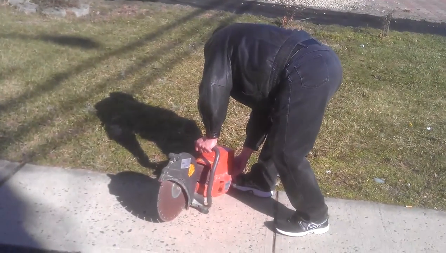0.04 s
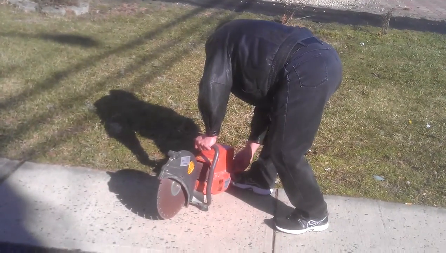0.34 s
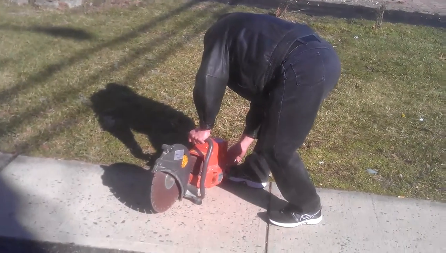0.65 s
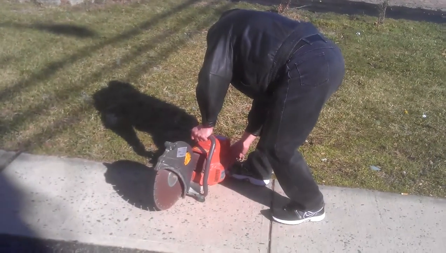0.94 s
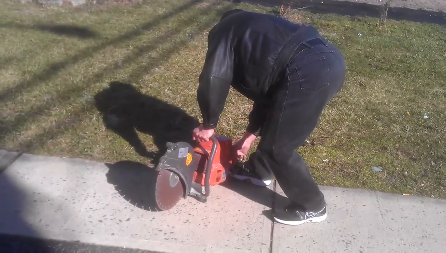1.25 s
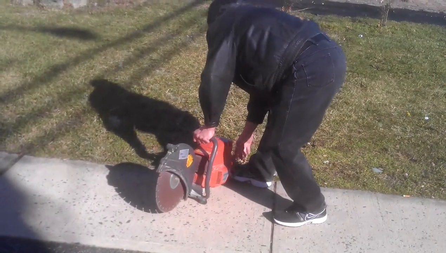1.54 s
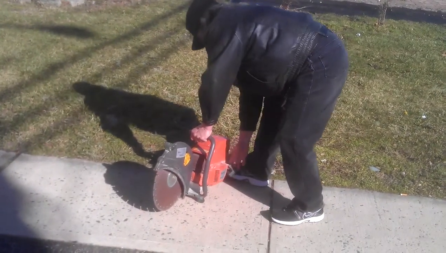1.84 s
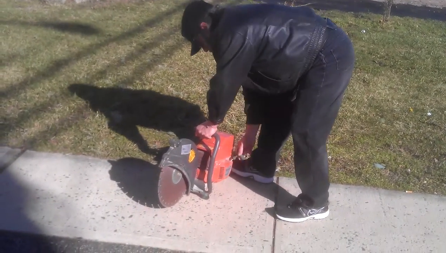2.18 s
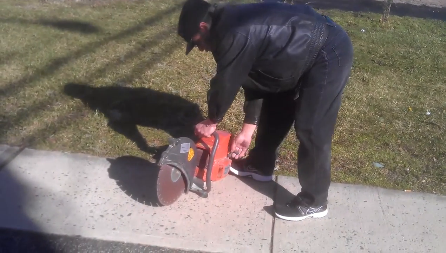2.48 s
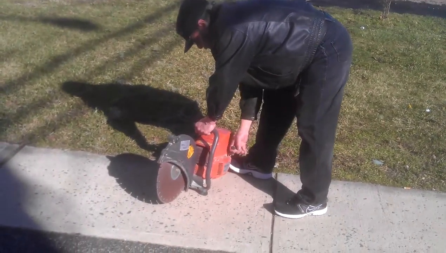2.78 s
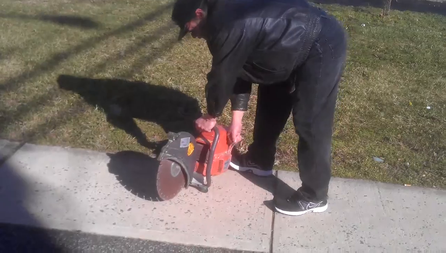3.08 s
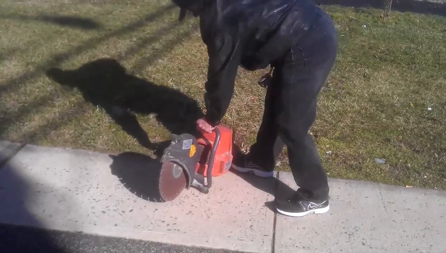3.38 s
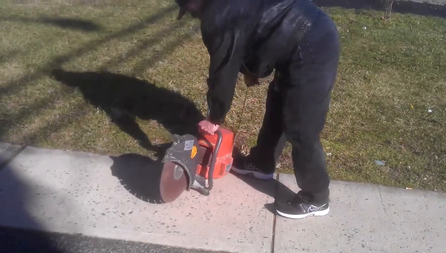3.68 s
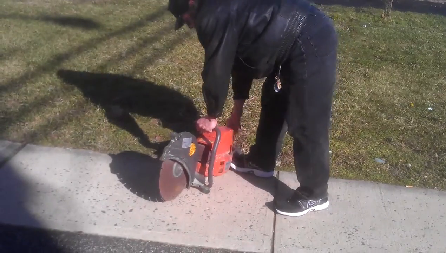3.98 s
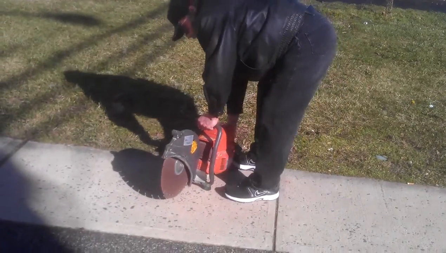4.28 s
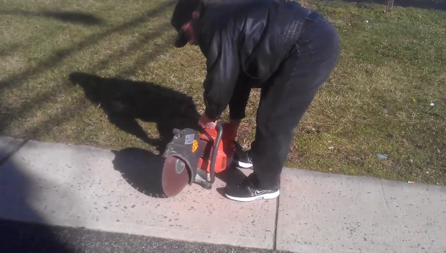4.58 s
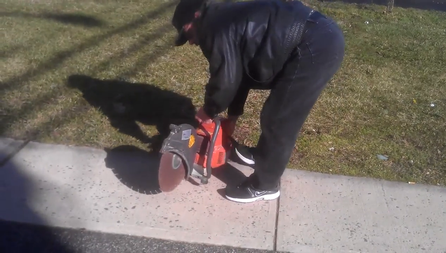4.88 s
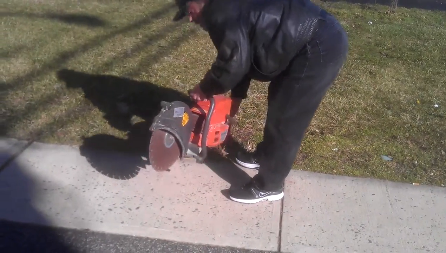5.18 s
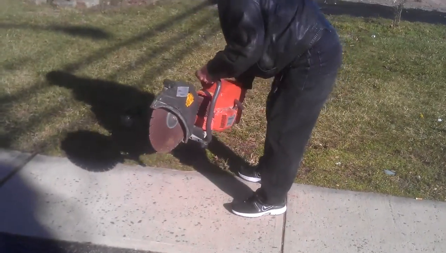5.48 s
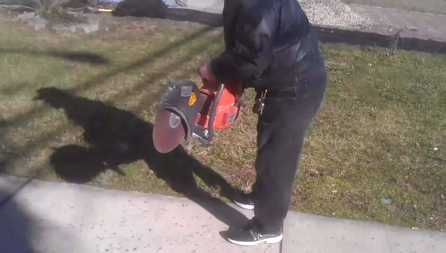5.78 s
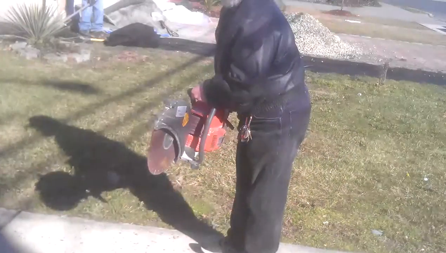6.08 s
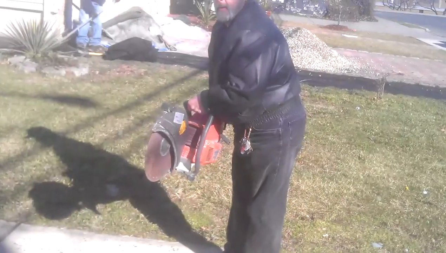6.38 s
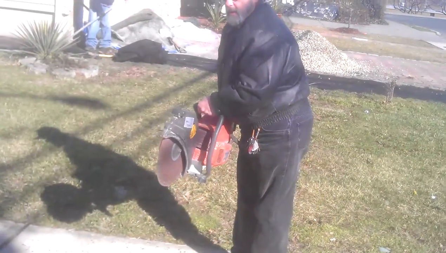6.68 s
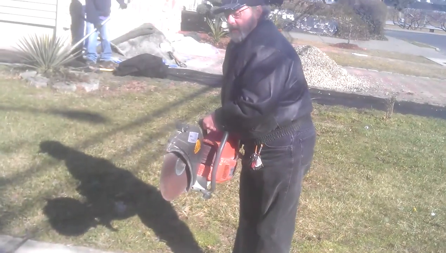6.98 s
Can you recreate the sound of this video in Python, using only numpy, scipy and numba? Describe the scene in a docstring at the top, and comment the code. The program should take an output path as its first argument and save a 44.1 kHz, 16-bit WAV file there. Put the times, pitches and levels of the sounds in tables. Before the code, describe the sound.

A two-stroke saw drones and surges under metallic ringing, then slows to an uneven, popping, clattering idle.

```python
"""A surging engine drone under a ringing, rattling blade: a two-stroke cut-off saw runs free by a house.
The piston forces the blade into its resonant modes, the casing hisses and the exhaust rasps.
After about 3.4 s the saw drops to a lumpy idle: the intake excites the air box on every turn, but
only every few turns does the cylinder fire, with a sharp bark. Twice it briefly purrs evenly.
The pavement scatters the sound, and the house returns a faint echo."""
import sys
import numpy as np
from scipy import signal
from scipy.fft import rfft, irfft
from scipy.io import wavfile
from scipy.ndimage import uniform_filter1d, minimum_filter1d
from numba import njit

SR = 44100
rng = np.random.default_rng(int(sys.argv[2]) if len(sys.argv) > 2 else 0)


def persist_wave(psi):
    """Save psi, clipped to +-1, as 16-bit WAV."""
    counts = np.round(np.clip(psi, -1, 1) * 32767).astype(np.int16)
    wavfile.write(sys.argv[1], SR, np.atleast_2d(counts).T)


N = 319284
T = np.arange(N) / SR

# Spectrum of the casing's hiss. Each row: frequency in Hz, relative level in dB.
HISS_SPECTRUM = [(1940, -60), (3300, -12), (3450, -15), (3670, -3.5), (3800, -9), (4150, -10.5),
                 (5620, -11), (6360, -11), (6890, -20.5), (7800, -9), (9000, -16), (9690, -9), (10400, -7),
                 (13500, -22.5), (14500, -43)]
# Spectrum of the exhaust's rasp. Each row: frequency in Hz, relative level in dB.
RASP_SPECTRUM = [(210, -9.5), (350, -19.5), (462, -21.5), (507, -12), (546, -23), (651, -16.5), (707, -13),
                 (859, -3), (1100, -8), (1420, -4.5), (1850, 2.5), (2050, 4), (2360, -3), (2590, 5.5),
                 (3200, -8.5), (4160, -17), (7040, -120)]
HUM_END_S, HUM_FADE_S = 1.33, .037
SETTLE_S, SETTLE_FADE_S = 1.72, .1  # the blade's modes shift as the saw settles


def undb(db):
    """Amplitude ratio of a level in decibels."""
    return 10 ** (np.asarray(db) / 20)


def unit(x):
    """Normalisation to an rms of 1."""
    return x / np.sqrt(np.mean(x ** 2))


def curves(table):
    """Linear interpolation of each column over the times in the first."""
    times, *columns = np.transpose(table)
    return [np.interp(T, times, column) for column in columns]


def step(at_s, fade_s):
    """Smooth transition from 0 to 1 around a moment."""
    return .5 + .5 * np.tanh((T - at_s) / fade_s)


def swells(rows):
    """Sum of Gaussian level changes in dB; each length is the width at half height."""
    return sum(db * .5 ** ((2 * (T - centre) / length) ** 2) for centre, length, db in rows)


def noise():
    """Gaussian white noise."""
    return rng.standard_normal(N)


def walk(rate_hz):
    """Smooth random fluctuation with a spread near 1."""
    hold = int(SR / rate_hz)
    return 1.33 * uniform_filter1d(np.repeat(rng.standard_normal(N // hold + 1), hold), hold)[:N]


def highpass(x, order, hz):
    """Butterworth attenuation below a cut-off frequency."""
    return signal.sosfilt(signal.butter(order, hz, "high", fs=SR, output="sos"), x)


def colour(x, spectrum, closed=True):
    """Spectral shaping by (Hz, dB) points; closed ends fall away steeply."""
    hz, db = np.transpose(spectrum)
    log_f = np.log(np.maximum(np.fft.rfftfreq(2 * N, 1 / SR), 1))
    beyond = np.abs(log_f - np.clip(log_f, np.log(hz[0]), np.log(hz[-1])))
    gain = undb(np.interp(log_f, np.log(hz), db) - closed * 60 * beyond)
    taps = np.roll(irfft(gain), 1024)[:2048] * np.hanning(2048)
    return signal.fftconvolve(x, taps)[1024:1024 + N]


@njit
def resonator(x, hz, width_hz):
    """A damped oscillator: band-pass response about a moving natural frequency."""
    y, band_state, low_state = np.empty(len(x)), 0., 0.
    for i in range(len(x)):
        tuning, damping = np.tan(np.pi * hz[i] / SR), width_hz / hz[i]
        band = (band_state + tuning * (x[i] - low_state)) / (1 + tuning * (tuning + damping))
        band_state = 2 * band - band_state
        low_state += 2 * tuning * band
        y[i] = damping * band
    return y


def per_cycle(cycles, scatter_db):
    """Cycle-to-cycle variation: a random gain held for one cycle."""
    gains = undb(scatter_db * rng.standard_normal(2048).clip(-2, 1.2))
    return gains[np.floor(cycles).astype(int) % 2048]


def chatter(cycles, decay, scatter_db, steady):
    """Amplitude-modulated noise: it flares each cycle and decays towards a steady rush."""
    return noise() * (steady + np.exp(-(cycles % 1) / decay) * per_cycle(cycles, scatter_db))


def bursts(times, levels_db, rise_s, decay_s, hold_s=0):
    """Noise transients with exponential rise and decay, which add in power."""
    power = np.zeros(N)
    for at_s, db in zip(times, levels_db):
        near = slice(*np.searchsorted(T, [at_s - .02, at_s + .08]))
        age = T[near] - at_s
        envelope = np.exp(np.minimum(age / rise_s, (hold_s - age) / decay_s).clip(None, 0))
        power[near] += (undb(db) * envelope) ** 2
    return np.sqrt(power) * noise()


def harmonic(turns, order, db, waver_db=1.3):
    """A sinusoid at one multiple of the crank speed, wavering in level."""
    return np.sqrt(2) * np.sin(2 * np.pi * (order * turns + rng.random())) * undb(db + waver_db * walk(6.4))


def outdoor_air():
    """Ambient noise: a faint, low rush of fluctuating level."""
    # Each row: frequency in Hz, relative level in dB.
    spectrum = [(25, -11), (60, -19), (110, 5.5), (200, 16), (500, -18), (2000, -16), (10000, -23)]
    return unit(colour(noise(), spectrum)) * undb(-59.5 + 2 * walk(4.23))


def outdoors(near_face, far_face, scatter_s, house_db, house_s):
    """Scattering from the pavement makes the sides differ; reflection adds an echo and a faint tail."""
    # Stereo width. Each row: frequency in Hz, gain of the side signal in dB.
    width = [(100, -9), (200, -29), (350, 0.5), (620, 15.5), (1200, -3.5), (2400, 2.5), (4500, 2),
             (8000, 3), (13000, 4)]
    wall_s, wall_db = .01025, -19
    t = T[:SR // 3]
    pavement, *house_echoes = rng.standard_normal((3, len(t)))
    # a quarter-cycle shift makes some frequencies lead on the left and others on the right
    lead = np.sign(rfft(pavement * np.exp(-t / scatter_s)).real)
    scatter = np.roll(irfft(1j * lead), 512)[:1024] * np.hanning(1024)
    incident = near_face + colour(.75 * far_face - .35 * near_face, [(1200, 0), (15000, 0)])
    side = colour(signal.fftconvolve(incident, scatter)[512:512 + N], width, closed=False)
    wall = undb(wall_db) * np.interp(T - wall_s, T, near_face, left=0)
    ears = []
    for sign, echoes in zip((1, -1), house_echoes):
        tail = echoes * np.exp(-t / house_s) * (t > .008)
        house = undb(house_db) * signal.fftconvolve(near_face, tail / np.linalg.norm(tail))[:N]
        ears.append(near_face + sign * side + wall + highpass(house, 2, hz=500) + outdoor_air())
    return np.array(ears)


def hum(hz=209.8, wobble=.0041, level_db=-50):
    """Beating: a wavering hum throbs against the drone, then dies away."""
    # Each row: harmonic number, relative level in dB.
    partials = [(1, 0), (4, -10), (5, 1)]
    phase = 2 * np.pi * np.cumsum(hz * (1 + wobble * walk(30.1))) / SR
    wave = sum(np.sin(k * phase) * undb(db + 2 * walk(19.6)) for k, db in partials)
    return unit(wave) * undb(level_db) * (1 - step(HUM_END_S, HUM_FADE_S))


def blade_song(rest_db=-37):
    """Narrow resonance: two high blade modes swell and fade as the saw shifts on the ground."""
    # Each row: centre in seconds, length in seconds, rise of the lower and of the upper mode in dB.
    spells = [(1.03, 0.6, 0, 7.5), (1.62, 0.44, 7.5, 5), (2.26, 0.2, 10, 2), (3.2, 0.4, 6.5, 5)]
    # Each row: frequency in Hz, bandwidth in Hz, an unused level in dB.
    modes = [(7772, 45, 0), (10003, 35, 0)]
    centres, lengths, *rises = np.transpose(spells)
    song = 0
    for (hz, width_hz, _), rise_db in zip(modes, rises):
        ringing = signal.lfilter(*signal.iirpeak(hz, hz / width_hz, fs=SR), noise())
        song += unit(ringing) * undb(rest_db + swells(zip(centres, lengths, rise_db)))
    return song


def blade_notes(wander=.003, flutter_db=2.5):
    """Forced vibration: the engine sustains two blade modes as slightly unsteady tones."""
    # Each row: frequency in Hz, shift once settled in Hz, relative level in dB at first and once settled.
    notes = [(3565, -32, -36, -33.5), (3787, 40, -31.5, -32)]
    settled, tones = step(SETTLE_S, SETTLE_FADE_S), 0
    for hz, shift_hz, first_db, later_db in notes:
        cycles = np.cumsum((hz + shift_hz * settled) * (1 + wander * walk(30))) / SR
        db = first_db + (later_db - first_db) * settled + flutter_db * (walk(6) + walk(50))
        tones += np.sin(2 * np.pi * cycles) * undb(db)
    return tones


def blade_ring(force):
    """Modal response of a stiff disc: its modes wander as it turns; it radiates little below the first."""
    # Each row: frequency in Hz, bandwidth in Hz, gain in dB, shift once settled in Hz.
    modes = [(3590, 36, 6, -31), (3717, 55, 7.5, -8), (3778, 48, 9, 50), (3932, 97, 2, -39),
             (4130, 70, -1, -10), (4336, 70, -4, 15), (4415, 52, -0.5, 9), (4586, 65, -3.5, -6),
             (5085, 130, -8, 24), (5780, 34, -10.5, 8), (6210, 20, -7.5, 7), (6530, 23, -5, 16),
             (7510, 14, -12, 7), (8170, 56, -12, 9), (8240, 110, -5.5, -12)]
    settled, drift = step(SETTLE_S, SETTLE_FADE_S), .0012 * walk(8)
    ringing = 0
    for k, (hz, width_hz, db, shift_hz) in enumerate(modes):
        sign = (-1) ** k
        mode_hz = hz * (1 + sign * drift) + shift_hz * settled
        ringing += sign * undb(db) * resonator(force, mode_hz, float(width_hz))
    return highpass(ringing, 10, hz=3400)


def ticks(per_s, scatter_db):
    """A Poisson process: loose parts touch the blade and guard at random, with uneven force."""
    contacts = rng.random(N) < per_s / SR
    return unit(contacts * np.sign(noise()) * undb(scatter_db * noise().clip(-2, 1.5)))


def guard_knocks():
    """Impact excitation: hard blows of the guard ring the blade and the rest of the saw."""
    # Each row: time in seconds, relative peak level in dB.
    knocks = [(.0997, -4), (0.29, 3), (0.341, 3), (0.407, 6), (0.62, 5), (0.7176, 7.5), (0.7735, -12),
              (0.834, 8), (1.0717, 9), (1.1552, 7), (1.8666, 3), (2.0732, 7), (2.1266, -13), (2.762, -1),
              (3.246, 11), (3.2981, 3), (3.319, 6.5), (3.807, 3), (3.934, 0)]
    times, levels_db = np.transpose(knocks)
    blows = bursts(times + .0015, levels_db, rise_s=.0006, decay_s=.002)
    body = undb(-4.5) * colour(blows, HISS_SPECTRUM) + undb(-20) * colour(blows, RASP_SPECTRUM)
    return undb(-3) * blade_ring(blows) + body


def drone(turns, surge_db, dip_db):
    """Harmonic series of the crank: odd orders grow as the hum dies, high ones surge most, low ones dip."""
    # Each row: multiple of the crank speed, relative level in dB during the hum and after it.
    orders = [(2, -55, -59), (3, -68, -57.5), (4, -60.5, -60.5), (5, -80, -72), (6, -66, -64.5),
              (7, -80, -70), (8, -60.5, -63), (9, -80, -67), (10, -55.5, -62), (11, -75, -60.5),
              (12, -55, -56.5), (13, -80, -67), (14, -64, -63), (15, -80, -68), (16, -58, -59),
              (18, -58, -66), (20, -54, -66), (22, -55, -49.5), (23, -70, -58), (24, -57, -48),
              (25, -62, -49), (26, -70, -60), (31, -46, -60)]
    # Slow changes. Each row: time in seconds, gain of all orders in dB, extra for orders 4 to 15 in dB.
    trend = [(0, -1, 2), (1.25, -0.5, -3.5), (1.6, 1.5, -4.5), (2.1, 3, -4.5), (2.5, 3, 0.5),
             (3.35, 1.5, 5.5)]
    trend_db, middle_db = curves(trend)
    after_hum, tones = step(HUM_END_S, HUM_FADE_S), 0
    for order, first_db, later_db in orders:
        base_db = first_db + (later_db - first_db) * after_hum + trend_db
        swing_db = .7 * surge_db + dip_db if order <= 8 else 1.5 * surge_db
        tones += harmonic(turns, order, base_db + swing_db + (4 <= order <= 15) * middle_db)
    return tones


def fast_running():
    """Periodic forcing: the piston shakes the saw twice a turn; blade, casing and exhaust surge as one."""
    # Each row: time in seconds, crank speed in Hz.
    speed = [(0, 84.25), (.4, 84.05), (1.3, 83.9), (1.45, 83.55), (1.66, 83.5), (1.87, 83.1), (2.3, 83.25),
             (2.55, 83.5), (3.3, 83.3)]
    # Between surges. Each row: time in seconds, relative levels of blade, hiss and rasp in dB.
    levels = [(0, -19, -27, -30), (.35, -23, -27, -32), (.68, -18.5, -26.5, -30.5),
              (1.25, -21.5, -21, -31.5), (1.7, -21.5, -23.5, -34), (1.95, -20.5, -26, -32.5),
              (2.2, -21.5, -22.5, -33), (2.55, -20.5, -25.5, -31.5), (3.3, -22, -22.5, -35)]
    # Each row: centre in seconds, length in seconds, rise in dB that each layer scales by its own factor.
    surges = [(.3, 0.53, 6.5), (.54, 0.055, 2.5), (.63, 0.015, 3.5), (.76, 0.02, 5.5), (.87, 0.13, 3),
              (1.06, 0.025, 6), (1.36, 0.083, 3), (1.59, 0.058, 5), (1.855, 0.053, 6.5), (2.06, 0.18, 2.5),
              (2.16, 0.025, 5), (2.31, 0.05, 8), (2.53, 0.12, 3.5), (2.75, 0.084, 6), (3.02, 0.11, 5),
              (3.27, 0.12, 5.5)]
    # Each row: centre in seconds, length in seconds, change of the low drone in dB.
    dips = [(1.785, .04, -16), (1.935, .08, -16), (2.44, 0.083, -5), (2.64, 0.089, -3)]
    blade_db, hiss_db, rasp_db = curves(levels)
    surge_db, dip_db = swells(surges), swells(dips)
    turns = np.cumsum(curves(speed)[0] * (1 + .0003 * walk(25))) / SR
    shake = unit(chatter(2 * turns + .25 * walk(60), decay=.32, scatter_db=2.5, steady=.3))
    rattle = ticks(per_s=900, scatter_db=7.7)
    blade = unit(blade_ring(shake + rattle)) * undb(blade_db - 1.33 + .8 * surge_db)
    rush = chatter(2 * turns + .31 * walk(60), decay=1, scatter_db=-.5, steady=1)
    hiss = unit(colour(rush, HISS_SPECTRUM)) * undb(hiss_db + .3 * surge_db + 1.9 * walk(40))
    puffs = chatter(2 * turns + .24 * walk(60), decay=1, scatter_db=4, steady=1)
    rasp_swing_db = .85 * surge_db + .25 * dip_db + .52 * walk(29.23)
    rasp = unit(colour(puffs, RASP_SPECTRUM)) * undb(rasp_db - 2 + rasp_swing_db)
    notes = blade_notes() * undb(.4 * surge_db)
    return blade + notes + hiss + rasp + drone(turns, surge_db, dip_db)


def firings(free_turns, even):
    """Intermittent combustion: single barks, and a soft firing every second turn in the even spells."""
    # Each row: time in seconds, relative levels of bark and thud in dB.
    lumpy = [(3.39, -11.5, -34), (3.423, -16.5, -30), (3.474, -18, -28.5), (3.5378, -14.5, -26),
             (3.6026, -15, -22.5), (3.6839, -17, -39), (3.7638, -14.5, -27), (3.8614, -13.5, -21),
             (3.9444, -12, -19.5), (4.0289, -10.5, -28), (4.1107, -14, -27), (4.1945, -10.5, -19.5),
             (4.2923, -14.5, -34), (4.374, -16, -30), (4.4587, -13.5, -28), (4.5441, -16, -31),
             (4.644, -10, -13.5), (4.7433, -13, -41), (4.8256, -13, -26), (4.9089, -10.5, -20.5),
             (4.9927, -4.5, -20), (5.093, -20, -34), (5.158, -18, -26), (5.2252, -12, -29),
             (5.3258, -13, -27), (5.4094, -8, -18), (5.4783, -6.5, -13.5), (5.5624, -9.5, -21.5),
             (5.646, -8, -21), (5.7278, -15, -33), (5.8108, -14, -20.5), (5.841, -21, -29),
             (5.9287, -9.5, -16), (6.0286, -9, -25), (6.112, -14.5, -19.5), (6.1577, -17, -23.5),
             (6.6189, -14.5, -22), (6.7022, -16.5, -45), (6.787, -13, -23), (6.854, -22, -38),
             (6.8892, -19, -28)]
    soft_bark_db, soft_thud_db = -26.5, -41
    second_turn = np.diff(np.floor(free_turns / 2), prepend=0) > 0
    times = T[second_turn & (even > .9)]
    scatter_db = 3 * rng.standard_normal(len(times))
    soft = np.column_stack([times, soft_bark_db + scatter_db, soft_thud_db + scatter_db])
    rows = np.vstack([lumpy, soft])
    return rows[np.argsort(rows[:, 0])].T


def crank(fire_s, free_turns):
    """Phase locking: the crank's turns are nudged so that every firing falls on a whole turn."""
    at_firing = np.interp(fire_s, T, free_turns)
    whole_turns = np.cumsum(np.round(np.diff(at_firing, prepend=0)))
    return free_turns + np.interp(T, fire_s, whole_turns - at_firing)


def lulls(fire_s, bark_db, onset_s=.0063, lull_s=.026, build_s=.024):
    """Level modulation: a drop in dB after each firing and a swell before it, growing with its force."""
    force = undb(.5 * bark_db)
    following = np.searchsorted(fire_s, T)
    last, coming = np.maximum(following - 1, 0), np.minimum(following, len(fire_s) - 1)
    age = np.abs(T - fire_s[last])
    sink = force[last] * (1 - np.exp(-age / onset_s)) * np.exp(-(age / lull_s) ** 2)
    build = force[coming] * np.exp(-((fire_s[coming] - T) / build_s) ** 2)
    return 22 * uniform_filter1d(sink - .36 * build, size=100)


def intake(turns, fire_s, even, box_hz, width_hz=85.):
    """Cavity resonance: one uneven gulp of air a turn rings the air box."""
    jitter_turns = .022 * (1 - even) * walk(45)
    gulps = np.diff(np.floor(turns - .06 + jitter_turns), prepend=0).clip(0, 1)
    gulps *= per_cycle(turns, scatter_db=2) ** (1 - .7 * even)
    # the gulps are weakest 18 % of the way from one firing to the next
    firing_phase = np.interp(T, fire_s, np.arange(len(fire_s)))
    choke_db = 12 * np.abs(np.cos(np.pi * (firing_phase - .18))) ** 3
    gulps *= undb(-choke_db * (1 - even))
    box = resonator(resonator(gulps, box_hz, width_hz), box_hz, width_hz)
    return unit(highpass(box, 4, hz=150))


def purr(turns):
    """Periodic flow: the exhaust pipe sounds low harmonics while the engine runs evenly."""
    # Each row: multiple of the crank speed, relative level in dB.
    orders = [(3, -5.5), (4, -0.5), (5, -2.5), (6, -3), (7, -13), (8, -14)]
    return unit(sum(harmonic(turns, order, db) for order, db in orders))


def clatter(turns):
    """Impact noise: the idling saw shakes once a turn, and loose parts ring the blade."""
    # Each row: frequency in Hz, relative level in dB.
    spectrum = [(1880, -38), (3200, -7.5), (3390, -0.5), (3700, 3), (4500, -0.5), (5010, -3), (6370, -3.5),
                (7010, -10), (7510, -3), (8050, 2), (9080, -1), (11300, 0.5), (13400, -13), (14200, -13),
                (14500, -30)]
    rattle = ticks(per_s=310, scatter_db=1.2)
    shake = unit(chatter(turns, decay=.25, scatter_db=3, steady=3)) + .3 * rattle
    blade = unit(blade_ring(rattle + .5 * noise()))
    return undb(.4) * unit(colour(shake, spectrum)) + undb(-5.5) * blade


def muffler(turns):
    """Acoustic filtering: the muffler colours one puff of gas a turn."""
    # Each row: frequency in Hz, relative level in dB.
    spectrum = [(180, -12.5), (300, -8.5), (548, -22), (770, -6), (905, -4.5), (1020, 0), (1130, -7.5),
                (1390, -8.5), (1650, -1.5), (2170, 1), (3050, -2), (3300, -10), (4290, -51), (7260, -120)]
    return unit(colour(chatter(turns, decay=.3, scatter_db=2.5, steady=1), spectrum))


def barks(fire_s, bark_db, thud_db):
    """Pressure transients: each firing gives a sharp crack and a slower, duller thud."""
    # In both spectra, each row: frequency in Hz, gain in dB.
    crack_spectrum = [(170, 0.5), (300, 0), (550, -7), (950, 0.5), (1400, -6), (2200, 9), (3100, -21),
                      (3900, 11), (5500, 3.5), (7000, 3.5), (8300, 11), (11500, 13), (14000, 1)]
    thud_spectrum = [(200, -12), (320, -1.5), (550, -8), (950, -5), (1400, -1.5), (2300, 8), (3000, -5)]
    blast = bursts(fire_s + .0005, bark_db, rise_s=.0005, decay_s=.0034, hold_s=.0028)
    crack = colour(blast, crack_spectrum) * undb(-6.5)
    push = bursts(fire_s + .0011, thud_db, rise_s=.0032, decay_s=.0046)
    thud = colour(push, thud_spectrum) * undb(6)
    return crack + highpass(thud, 3, hz=160)


def idling(lumpy_hz=60.3, speed_change_s=.05):
    """Inertia: the crank coasts a few turns between firings; in two spells it runs faster and evenly."""
    # Each row: time in seconds, intake level in dB, air box resonance in Hz, clatter level in dB,
    # muffler level in dB; the levels are relative.
    course = [(3.4, -42.5, 258, -26.5, -34.5), (3.92, -37.5, 252, -23.5, -31), (4.4, -39, 246, -24.5, -34),
              (4.7, -37, 250, -23, -33.5), (5.05, -42.5, 246, -26.5, -35.5), (5.22, -41, 236, -23, -30.5),
              (5.5, -43, 230, -24, -28.5), (5.8, -54, 280, -25, -32), (6.0, -44.5, 322, -22, -29.5),
              (6.22, -50, 322, -25, -33.5), (6.4, -43, 324, -28, -31.5), (6.55, -46.5, 324, -23.5, -32),
              (6.85, -46.5, 330, -25.5, -34.5), (7.24, -56, 322, -28, -33.5)]
    # Spells of even running. Each row: start in seconds, end in seconds.
    even_spells = [(6.16, 6.48), (6.91, 7.3)]
    # Within those spells. Each row: time in seconds, crank speed in Hz, relative purr level in dB.
    even_run = [(6.16, 75.5, -46), (6.3, 75, -45), (6.34, 70.2, -43), (6.46, 69.6, -44), (6.91, 76, -51),
                (7.02, 76.5, -50), (7.08, 68.3, -44), (7.24, 67.8, -43.5)]
    intake_db, box_hz, clatter_db, muffler_db = curves(course)
    even_hz, purr_db = curves(even_run)
    in_spell = sum(1. * ((T > start) & (T < end)) for start, end in even_spells)
    even = uniform_filter1d(in_spell, int(speed_change_s * SR))
    free_turns = np.cumsum(lumpy_hz + (even_hz - lumpy_hz) * even) / SR
    fire_s, bark_db, thud_db = firings(free_turns, even)
    turns, lull_db = crank(fire_s, free_turns), lulls(fire_s, bark_db)
    return (intake(turns, fire_s, even, box_hz) * undb(intake_db - 10 * even)
            + purr(free_turns) * undb(purr_db) * even
            + clatter(turns) * undb(clatter_db - lull_db)
            + muffler(turns) * undb(muffler_db + .33 - 1.11 * lull_db)
            + barks(fire_s, bark_db, thud_db))


def saw(drop_s=3.357):
    """Superposition: the fast run gives way to the idle in an equal-power fade, under the knocks."""
    slow = step(drop_s, fade_s=.064)
    fast = fast_running() + hum() + blade_song()
    return np.sqrt(1 - slow) * fast + guard_knocks() + np.sqrt(slow) * idling()


def scene():
    """Partial coherence: the saw's near and far faces move in step, but each rattles in its own way."""
    return undb(-1.06) * outdoors(saw(), saw(), scatter_s=.016, house_db=-6.5, house_s=.023)


def limiter(x, ceiling_db):
    """Peak limiting: the gain ducks briefly around any peak above the ceiling."""
    gain = np.minimum(1, undb(ceiling_db) / (np.abs(x).max(axis=0) + 1e-9))
    return x * uniform_filter1d(minimum_filter1d(gain, size=64), size=64)


def record(dry):
    """Frequency response: two microphone ports colour the sides; peaks are limited and the top is cut."""
    # Each row: frequency in Hz, left minus right level in dB.
    imbalance = [(100, 2), (400, 3.5), (1200, 2), (3500, 2), (5500, 0.5), (7700, -9), (10000, 7.5),
                 (13000, 9)]
    top_hz = 13950
    ports = [colour(x, [(hz, side * db / 2) for hz, db in imbalance], closed=False)
             for x, side in zip(dry, (1, -1))]
    held = limiter(np.array(ports), ceiling_db=-.2)
    return signal.sosfiltfilt(signal.ellip(8, .1, 50, top_hz, fs=SR, output="sos"), held)


dry = scene()
out = record(dry)
persist_wave(out)
```